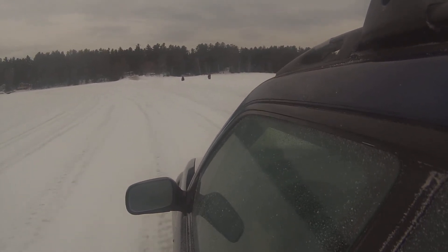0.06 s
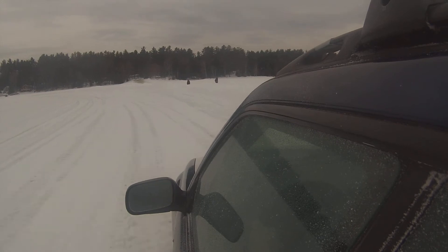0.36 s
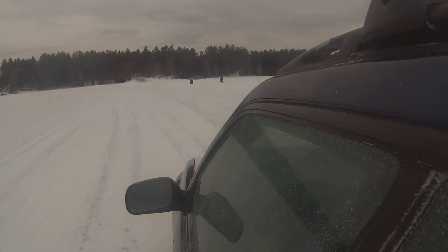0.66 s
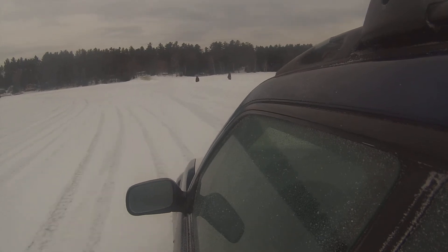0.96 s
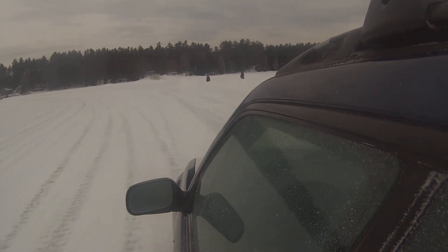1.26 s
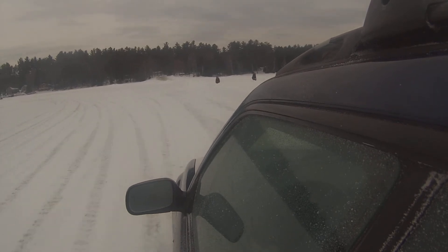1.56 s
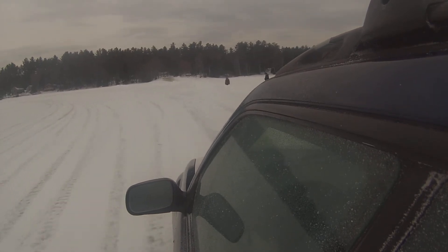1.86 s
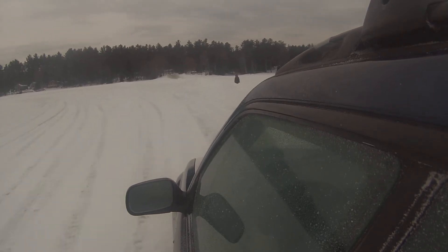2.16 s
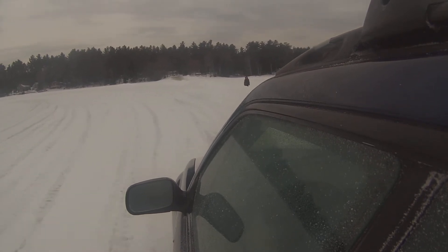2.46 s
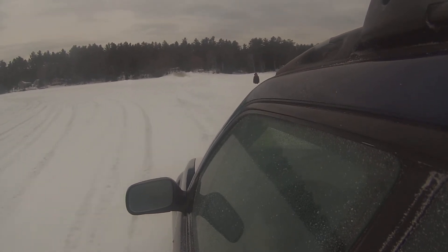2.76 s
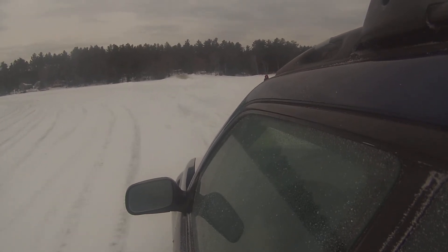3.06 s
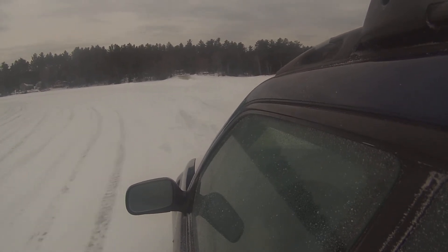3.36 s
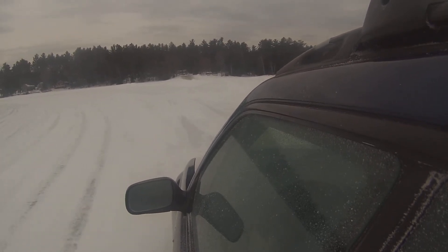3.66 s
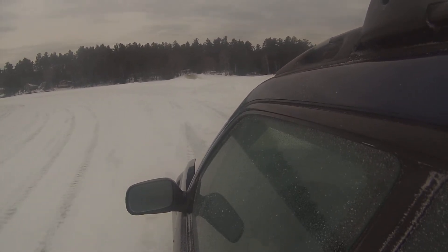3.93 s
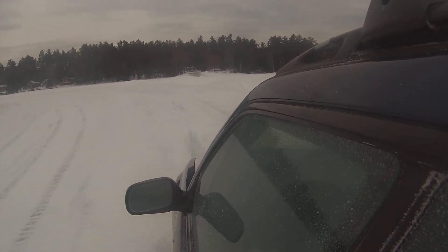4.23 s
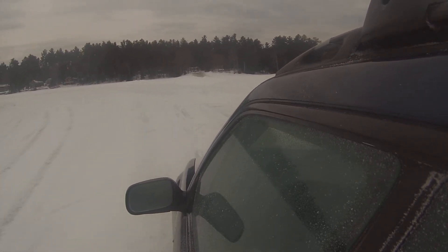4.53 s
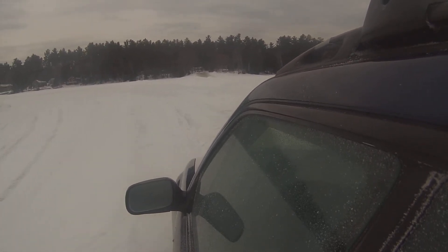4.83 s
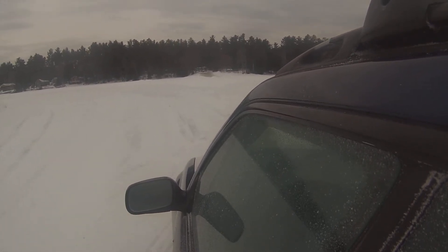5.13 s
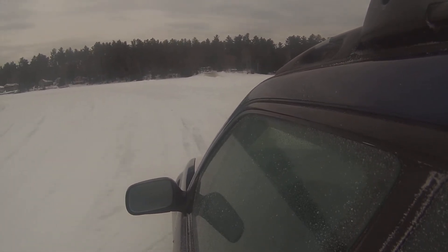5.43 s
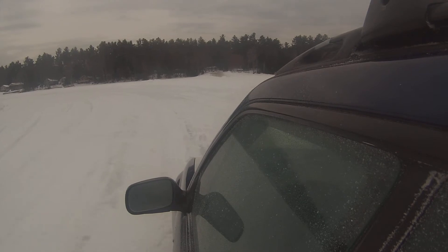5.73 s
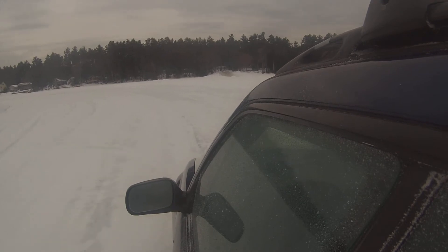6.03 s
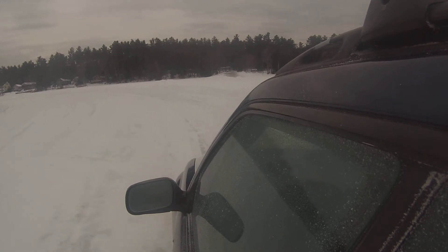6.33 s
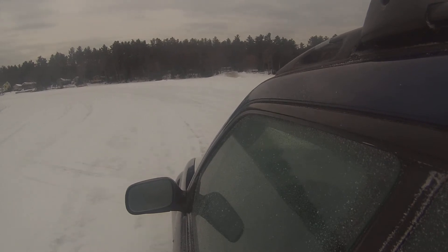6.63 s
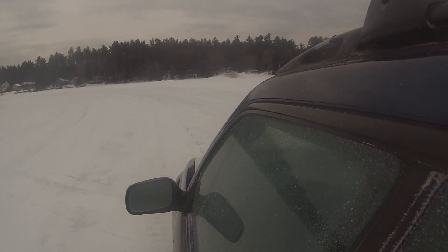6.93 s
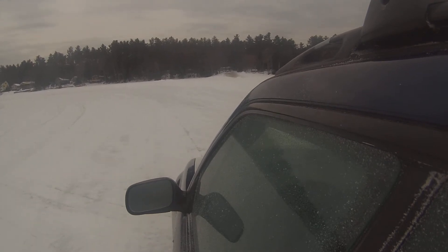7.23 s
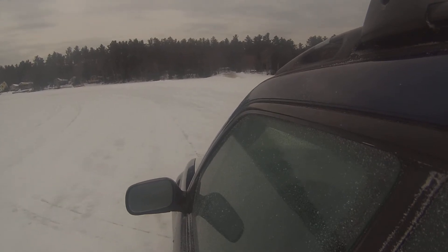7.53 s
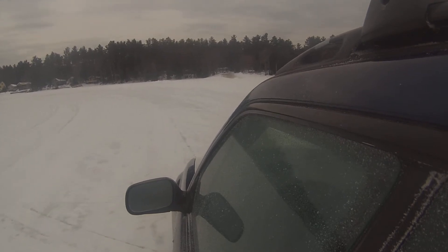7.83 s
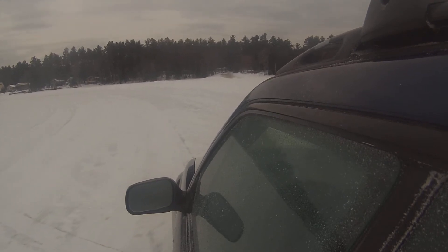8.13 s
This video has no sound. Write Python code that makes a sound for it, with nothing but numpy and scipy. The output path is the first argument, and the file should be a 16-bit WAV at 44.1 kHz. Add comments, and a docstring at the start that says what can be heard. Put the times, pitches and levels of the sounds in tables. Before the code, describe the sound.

Deep, bumpy car rumble and crunching snow fade as it brakes to idle, ending with two door latch clicks.

```python
"""On a snow-covered frozen lake a car rolls, engine idling, and brakes to a stop, heard from its side.
The bumpy ride sets the body and a camera mount swinging; the housing ticks when it is shaken hard.
Snow crunches and sprays under the tyres, thinning to single crumps, and bits of ice hit the bodywork.
A brake sings faintly on the way, and near the end the door latch clicks."""
import sys
import numpy as np
from scipy import signal
from scipy.fft import rfft, irfft, next_fast_len
from scipy.io import wavfile
from scipy.ndimage import uniform_filter1d, minimum_filter1d

SR = 44100
rng = np.random.default_rng(int(sys.argv[2]) if len(sys.argv) > 2 else 0)


def file_out(sig):
    """Save sig as 16-bit WAV at sys.argv[1]."""
    # one column per channel
    cols = np.atleast_2d(sig).T
    # limit, then scale
    lim = np.clip(cols, -1, 1)
    pcm = np.round(lim * 32767).astype(np.int16)
    wavfile.write(sys.argv[1], SR, pcm)


N = 369999
T = np.arange(N) / SR

# tone colour of breaking snow: (frequency [Hz], relative level [dB])
SNOW_COLOUR = [(400, -14), (650, -12.5), (800, -5.5), (1060, -2.5), (1200, -0.5), (1450, 3.5), (1550, -1),
               (1850, -2.5), (2100, -4.5), (2500, -8.5), (4000, -22.5)]
# the wheel arch rings with the breaking snow: (frequency [Hz], width [Hz], boost [dB])
ARCH_MODES = [(788, 18, 4.5), (1006, 50, 1.5), (1185, 45, 6), (1300, 90, 3), (1430, 97, 1), (1510, 85, -1),
              (1643, 123, 3), (1850, 50, -5), (2530, 320, -2.5)]


def from_db(db):
    """Decibels to gain."""
    return 10 ** (np.asarray(db) / 20)


def rms_one(x):
    """Scale to unit power."""
    return x / np.sqrt(np.mean(x ** 2) + 1e-20)


def evened(x, span_s):
    """Hold the power steady over spans of this length."""
    return x / np.sqrt(uniform_filter1d(x ** 2, max(int(span_s * SR), 3)).clip(1e-12))


def in_time(rows):
    """Breakpoint rows (time, values...) to one curve per value."""
    times, *columns = np.transpose(rows)
    return [np.interp(T, times, column) for column in columns]


def swells(rows, edge_s):
    """Envelope for rows of (start [s], length [s], level [dB]): each fades in and out."""
    return sum(from_db(db) * np.clip(0.5 + np.minimum(T - s, s + length - T) / edge_s, 0, 1)
               for s, length, db in rows)


def rolling(speed, level_db, power):
    """Gain of a sound that grows as a power of the speed."""
    return from_db(level_db) * speed ** power


def drift(per_s):
    """Smooth random modulation; rms 1."""
    knots = rng.standard_normal(N // 20)
    return rms_one(np.interp(T * per_s, np.arange(len(knots)), knots))


def tone(cycles):
    """A sine from its running phase in cycles; rms 1."""
    return np.sqrt(2) * np.sin(2 * np.pi * cycles)


def grains(per_s, spread_db):
    """Random fractures: many small, a few large."""
    sizes = from_db(spread_db * np.minimum(rng.exponential(1, N), 4)) * rng.choice([-1, 1], N)
    return sizes * (rng.random(N) < per_s / SR)


def clicks_at(s, db):
    """Single clicks at given times and levels."""
    out = np.zeros(N)
    out[np.clip(np.round(np.asarray(s) * SR).astype(int), 0, N - 1)] = from_db(db)
    return out


def ring(clicks, hz, t60):
    """A unit click sets a sine of height 1 ringing down."""
    decay, angle = from_db(-60 / (t60 * SR)), 2 * np.pi * hz / SR
    return signal.lfilter([0, np.sin(angle)], [1, -2 * decay * np.cos(angle), decay ** 2], clicks + 1e-18)


def resonant(x, modes):
    """Each mode lifts or dips its own narrow band; rms 1."""
    for hz, width, db in modes:
        x = x + (from_db(db) - 1) * signal.lfilter(*signal.iirpeak(hz, hz / width, fs=SR), x)
    return rms_one(x)


def coloured(x, spectrum):
    """Shape a sound with a smooth minimum-phase EQ curve; rms 1."""
    size = next_fast_len(N + SR // 4) * 2
    hz, db = np.transpose(spectrum)
    octaves = np.log2(np.maximum(np.fft.rfftfreq(size, 1 / SR), 1))
    outside = np.maximum(np.log2(hz[0]) - octaves, 0) + np.maximum(octaves - np.log2(hz[-1]), 0)
    curve_db = np.interp(octaves, np.log2(hz), db) - 20 * np.minimum(outside, 2)
    cepstrum = irfft(np.log(from_db(curve_db)))
    cepstrum[1:size // 2] *= 2
    cepstrum[size // 2 + 1:] = 0
    return rms_one(irfft(rfft(x, size) * np.exp(rfft(cepstrum)))[:N])


def swinging(modes, span_s):
    """Random bumps keep steep-sided resonances swinging at a steady power."""
    hz = np.fft.rfftfreq(2 * next_fast_len(N), 1 / SR)[1:]
    power = sum(from_db(db) ** 2 / (1 + 1.1 * ((hz - centre ** 2 / hz) / (1.5 * width)) ** 2) ** 2
                for centre, width, db in modes)
    bumps = rng.standard_normal((2, len(hz)))
    spectrum = np.sqrt(power) * (bumps[0] + 1j * bumps[1])
    return evened(irfft(np.r_[0, spectrum])[:N], span_s)


def still_air():
    """A faint, steady bed of air over the lake."""
    # tone colour of the air: (frequency [Hz], relative level [dB])
    colour = [(100, -3), (230, 3.5), (600, 1.5), (1200, -3.5), (1700, -6.5), (2100, -5), (2400, -9),
              (2850, -5.5), (4200, -12), (5100, -11), (6200, -16), (8200, -14), (9200, -20.5),
              (11000, -14.5), (12500, -25), (15000, -35)]
    return from_db(-62.5) * coloured(rng.standard_normal(N), colour)


def whine():
    """The camera's electronics whine on a few thin tones."""
    # steady tones: (frequency [Hz], rms level [dB])
    partials = [(3000, -90), (4000, -95), (5000, -90), (7000, -98), (10000, -93), (11070, -94)]
    return sum(from_db(db) * tone(hz * T) for hz, db in partials)


def engine(firing_hz=25.74, wander=0.0075, ease_s=8.0, ease_takes_s=0.14):
    """The idling exhaust throbs on multiples of the firing rate; the load comes off as the car stops."""
    # exhaust tones: (multiple of the firing rate, rms level [dB], change off load [dB])
    orders = [(3, -41.5, -10), (3.5, -48, 1.5), (4.5, -66, -7), (5, -63.5, -2), (6, -67, 1), (7, -74, 3)]
    firings = np.cumsum(firing_hz * (1 + wander * drift(1.8))) / SR
    eased = np.clip((T - ease_s) / ease_takes_s, 0, 1)
    throb = from_db(0.5 * drift(11))
    return throb * sum(from_db(db + ease_db * eased + 3.5 * drift(25)) * tone(k * firings + rng.random())
                       for k, db, ease_db in orders)


def brake_pads(uneven_db=4.0):
    """Dry rubbing keeps the brake whispering in the last turns of the wheel."""
    # pad rubs: (start [s], length [s], level [dB])
    rubs = [(7.1, 0.35, -72), (8.08, 0.33, -71)]
    # brake resonances: (frequency [Hz], width [Hz], relative level [dB])
    modes = [(2070, 230, 2), (2800, 250, -7), (5100, 900, -8)]
    return swells(rubs, edge_s=0.06) * from_db(uneven_db * drift(45)) * swinging(modes, span_s=0.05)


def brake_squeal(waver_hz=16, uneven_db=1.5):
    """Friction sets one mode of the disc singing, a rough tone that flutters and sags."""
    # squeals: (start [s], length [s], first pitch [Hz], last pitch [Hz], level [dB])
    squeals = [(4.825, 0.083, 2850, 2825, -66.5), (4.91, 0.11, 2840, 2730, -64.5),
               (5.02, 0.11, 2845, 2820, -66)]
    out = np.zeros(N)
    for s, length, first_hz, last_hz, db in squeals:
        hz = in_time([(s, first_hz), (s + length, last_hz)])[0] + waver_hz * drift(150)
        out += swells([(s, length, db)], edge_s=0.025) * tone(np.cumsum(hz) / SR)
    return out * from_db(uneven_db * drift(110))


def door_latch():
    """Short, hard clicks of a small metal catch."""
    # latch clicks: (time [s], level [dB], offset of the two lowest modes [dB])
    clicks = [(7.888, -42.5, 2.5), (8.002, -41, -13)]
    # ring of the catch: (frequency [Hz], gain [dB], t60 [s])
    modes = [(1310, -7, 0.022), (3200, -3.5, 0.0094), (4960, -6, 0.0033), (5700, -11, .003),
             (6500, -7.5, 0.0054), (8400, -16, .003)]
    s, db, low_db = np.transpose(clicks)
    return sum(ring(clicks_at(s, db + mode_db + low_db * (k < 2)), hz, t60)
               for k, (hz, mode_db, t60) in enumerate(modes))


def ice_grit():
    """Loose crumbs of ice patter on the bodywork."""
    # showers of crumbs: (start [s], length [s], level [dB])
    showers = [(0.22, 0.49, -62), (3.05, 0.077, -60), (4.1, 0.33, -69.5), (5.8, .06, -78),
               (6.27, 0.084, -67.5)]
    # tone colour of the patter: (frequency [Hz], relative level [dB])
    colour = [(1500, -11.5), (3400, 6), (4800, 4.5), (6600, -2), (8500, -2.5), (12000, -6.5), (14500, -33)]
    return swells(showers, edge_s=0.021) * coloured(grains(per_s=700, spread_db=5.5), colour)


def ice_chips(crack=0.15):
    """Chips of ice thrown against the body strike with a crack and ring briefly."""
    # chip impacts: (time [s], level [dB], pitch [Hz], t60 [s])
    strikes = [(0.07, -32, 3870, 0.0082), (0.070, -29.5, 4770, 0.0048), (0.265, -47, 9500, .004),
               (1.386, -26, 1890, 0.01), (1.391, -35, 2920, 0.004), (2.188, -37, 4700, 0.0046),
               (6.290, -36.5, 3140, 0.0019)]
    out = np.zeros(N)
    for s, db, hz, t60 in strikes:
        hit = clicks_at([s], db)
        out += ring(hit, hz, t60) + crack * ring(hit, 0.97 * min(hz, 4700), t60 / 4)
    return out


def body_sway(speed, moving, sway_hz=24.76, wander=0.03593):
    """The body rocks on its suspension in one deep mode, swelling on big bumps."""
    # big bumps: (start [s], length [s], level [dB])
    bumps = [(0.0, 0.07, -11), (0.27, 0.24, -14), (0.65, 0.11, -16), (1.13, 0.18, -30), (1.38, 0.32, -23.5),
             (1.84, 0.12, -15.5), (2.1, 0.25, -18.5), (2.56, 0.14, -17.5), (3.18, 0.15, -16.5),
             (3.5, 0.3, -20), (3.96, 0.43, -20.5), (4.7, 0.29, -20), (5.11, 0.44, -20), (5.78, 0.24, -20.5),
             (6.1, 0.28, -19.5), (6.5, 0.62, -23.5), (7.18, 0.6, -26)]
    cycles = np.cumsum(sway_hz * (1 + wander * drift(4.7))) / SR + rng.random()
    gain = np.maximum(moving * rolling(speed, level_db=-30, power=0.11), swells(bumps, edge_s=0.14))
    return gain * tone(cycles)


def body_panel(speed, uneven_db=2.7):
    """A body panel drones with the speed, louder at each jolt."""
    # jolts: (start [s], length [s], level [dB])
    jolts = [(0.02, 0.66, -28.5), (1.3, 0.65, -41), (2.7, 0.58, -35), (3.47, 0.31, -41.5),
             (3.92, 0.27, -36.5), (5.23, 0.1, -34.5), (6.16, 0.1, -40.5), (6.45, 0.15, -43.5),
             (6.97, 0.23, -44)]
    # panel resonances: (frequency [Hz], width [Hz], relative level [dB])
    modes = [(132.7, 10.3, 2.5), (120.3, 26, -11.5)]
    gain = np.hypot(rolling(speed, level_db=-36.5, power=0.74), swells(jolts, edge_s=0.13))
    return gain * from_db(uneven_db * drift(8)) * swinging(modes, span_s=0.17)


def mount_shake(speed, moving, ducking=0.39, uneven_db=2.5):
    """The mount rumbles at random; on rutted stretches it locks into a judder at one pitch."""
    # mount resonances: (frequency [Hz], width [Hz], relative level [dB])
    modes = [(30.64, 10, -2), (41.16, 12, -4.5), (57.83, 12, -0.5), (76.2, 12, 0.5), (90, 12, -2),
             (101.4, 13, -12)]
    # snow ridges shake it harder: (start [s], length [s], level [dB])
    ridges = [(0.0, 0.024, -4.5), (0.98, 0.085, -21), (4.07, 0.093, -26), (4.3, 0.087, -23.5),
              (4.49, 0.063, -22), (4.75, 0.19, -25), (5.11, 0.093, -28), (5.24, 0.1, -25.5),
              (5.39, 0.12, -28), (5.68, 0.053, -29), (5.82, 0.059, -29.5), (5.97, 0.17, -32.5),
              (6.19, 0.14, -29), (6.46, 0.064, -28.5), (6.66, 0.14, -34.5), (7.1, 0.053, -35.5),
              (7.58, 0.098, -39)]
    # judders: (start [s], length [s], first pitch [Hz], last pitch [Hz], first level [dB], last level [dB])
    judders = [(0.288, 0.38, 83.8, 78.6, -17.5, -18), (1.766, 0.2, 87.5, 89.8, -21.5, -21),
               (2.631, .37, 77.75, 77.7, -22.5, -17), (3.004, .24, 75.9, 72.4, -20, -18),
               (3.52, 0.13, 71, 68.7, -23, -24), (4.347, .6, 59.03, 52.3, -29.5, -30.5)]
    jarring = np.hypot(moving * rolling(speed, level_db=-21, power=0.8), swells(ridges, edge_s=0.092))
    shake = jarring * from_db(1.2 * drift(8.3)) * swinging(modes, span_s=0.12)
    for s, length, first_hz, last_hz, first_db, last_db in judders:
        hz, db = in_time([(s, first_hz, first_db), (s + length, last_hz, last_db)])
        locked = swells([(s, length, 0)], edge_s=0.033)
        swing = tone(np.cumsum(hz) / SR + rng.random())
        shake = shake * (1 - ducking * locked) + locked * from_db(db + uneven_db * drift(30)) * swing
    return shake


def housing_ticks(shake, chatter_db=-51, full_swing=0.25, bounce_s=0.0042, bounce_db=-6, hard_db=-33):
    """The loose housing ticks just after each turn of the mount's swing and bounces twice."""
    # runs of louder rattling: (start [s], length [s], first level [dB], last level [dB])
    rattles = [(0.347, 0.31, -41.5, -46), (1.842, 0.09, -39, -34), (2.345, 0.033, -33, -37),
               (2.597, 0.057, -34, -38), (2.727, 0.14, -36.5, -41), (2.905, 0.29, -42, -44),
               (4.31, 0.078, -47, -41)]
    # hard knocks against the mount, and two chips of ice striking the housing (at 0.068 s and 2.187 s): (time
    # [s], level [dB])
    knocks = [(0.068, -36), (0.309, -40), (0.41, -47), (0.474, -37), (0.505, -51), (0.539, -37.5),
              (0.589, -34.5), (0.602, -35), (0.9362, -37.5), (1.782, -36), (1.862, -42), (1.873, -37),
              (1.885, -36), (2.015, -47), (2.0562, -44), (2.1868, -39), (2.2544, -41), (2.75, -39),
              (2.829, -37.5), (2.942, -39), (2.968, -34.5), (3.008, -40), (3.045, -44), (3.073, -35.5),
              (3.087, -40), (3.1, -41), (3.114, -35), (3.129, -33.5), (3.156, -35), (3.17, -36),
              (3.181, -34), (3.223, -41), (3.235, -40), (3.614, -41), (3.9686, -46), (4.117, -47),
              (4.2306, -45), (5.1482, -44.5), (5.153, -49), (5.2217, -47), (5.822, -50), (6.3123, -51),
              (6.783, -54)]
    # ring of the housing: (frequency [Hz], gain [dB], t60 [s])
    modes = [(3570, -7, 0.0055), (4700, -31, 0.005), (6340, 1, 0.0041), (7060, -4, 0.0054),
             (9350, -15.5, 0.006), (11500, -16.5, 0.0042), (12700, -16, .002)]
    turns = signal.find_peaks(np.abs(shake), height=0.02, distance=SR // 260)[0]
    runs_db = [np.interp(turns / SR, [s, s + length], [first, last], chatter_db, chatter_db)
               for s, length, first, last in rattles]
    swing_db = 20 * np.log10(np.minimum(np.abs(shake[turns]) / full_swing, 1))
    return_db = -3 * (shake[turns] < 0)  # softer on the way back
    scatter_db = 5.5 * rng.uniform(-2.1, 1, N)[turns]
    turn_db = np.max(runs_db, axis=0) + 1.2 * swing_db + return_db + scatter_db
    flight_s = bounce_s * rng.uniform(0.66, 1.4, N)[turns]
    chatter = sum(clicks_at(turns / SR + 0.0036 + k * flight_s, turn_db + k * bounce_db) for k in range(3))
    hits = clicks_at(*np.transpose(knocks)) + chatter
    # each contact scuffs for an instant, differently for every mode
    scuff = 0.16 * signal.lfilter([1], [1, -np.exp(-1 / (0.00081 * SR))], hits + 1e-18)
    ticks = sum((-1) ** k * from_db(db) * ring(hits + scuff * rng.standard_normal(N), hz, t60)
                for k, (hz, db, t60) in enumerate(modes))
    # a light touch sounds mostly the main pair of modes, a hard knock all of them
    hardness = np.clip(-minimum_filter1d(-hits, size=SR // 200) / from_db(hard_db), 0, 1)
    soft = signal.sosfilt(signal.butter(1, [5600, 7900], "band", fs=SR, output="sos"), ticks)
    return soft + hardness * (ticks - soft)


def snow_packing():
    """Single grains give way under the creeping tyres and ring in the wheel arch."""
    # spells of sparse crackle: (start [s], length [s], level [dB])
    spells = [(6.7, 0.8, -69), (7.52, 0.38, -68.5)]
    crackle = coloured(grains(per_s=150, spread_db=5.0), SNOW_COLOUR)
    return swells(spells, edge_s=0.05) * resonant(crackle, ARCH_MODES)


def snow_crumps(t60=0.0093, crumble_s=0.0087, fractures_per_s=2000, low_cut_hz=550):
    """A lump of crust snaps under a tyre, then crumbles in a short burst of dry fractures."""
    # lumps giving way: (time [s], level [dB], pitch [Hz])
    lumps = [(0.515, -29, 1440), (3.221, -34, 815), (3.68, -36.5, 700), (4.492, -38, 1272),
             (5.305, -39, 1300), (5.836, -47, 1423), (5.944, -37, 1260), (7.031, -42, 1332),
             (7.072, -38, 1310), (7.193, -50, 1330), (7.553, -47, 1240), (7.620, -40, 1200),
             (7.69, -40.5, 1507), (7.704, -52.5, 1450), (7.779, -47.5, 980), (7.822, -53, 1400),
             (8.076, -46, 1400)]
    out, age = np.zeros(N), np.arange(SR // 8) / SR
    for s, db, hz in lumps:
        fractures = rng.uniform(-0.98, 1, len(age)) * (rng.random(len(age)) < fractures_per_s / SR)
        force = from_db(db) * ((age == 0) + 0.83 * fractures * np.exp(-age / crumble_s))
        thud = 0.33 * ring(force, 0.8 * hz, t60 / 2)
        crisp = 0.27 * ring(force, hz=2750, t60=0.002)
        burst = ring(force, hz, t60) + thud - crisp
        start = round(s * SR)
        out[start:start + len(age)] += burst[:N - start]
    return signal.sosfilt(signal.butter(2, low_cut_hz, "high", fs=SR, output="sos"), out + 1e-18)


def snow_crust():
    """The tread scrapes over crust: coarse fractures ring in the tyre and the wheel arch."""
    # crusted patches: (start [s], length [s], level [dB])
    patches = [(1.5, 0.295, -46), (3.36, 0.083, -48.5), (4.38, 0.065, -49.5), (4.7, 0.083, -48),
               (4.89, 0.092, -48), (4.99, 0.16, -52.5), (5.15, 0.12, -54), (5.28, 0.049, -54),
               (5.43, .05, -51), (6.19, 0.06, -54), (6.35, 0.16, -60.5), (6.94, 0.16, -63),
               (7.6, 0.055, -58)]
    # ring of the tyre: (frequency [Hz], width [Hz], boost [dB])
    tyre_modes = [(1250, 150, 5), (1660, 80, 3.5)]
    fractures = coloured(grains(per_s=900, spread_db=2.5), SNOW_COLOUR)
    scrape = resonant(fractures, ARCH_MODES + tyre_modes)
    return swells(patches, edge_s=0.063) * evened(scrape, span_s=0.035)


def tyres(speed, crunch_db=-40, grip_s=3.22, grip_takes_s=0.17, slip_db=2.5):
    """Snow grains break under the tread, fewer as the car slows; fine spray hisses over a rolling roar."""
    # tone colour of the spray: (frequency [Hz], relative level [dB])
    spray_colour = [(1500, -15.5), (2400, 6.5), (2900, 5), (3300, 6), (4200, -1.5), (5500, -8), (6600, -6),
                    (8000, -13), (11000, -23), (15000, -41)]
    # loose powder flung up: (start [s], length [s], level [dB])
    puffs = [(0.42, 0.27, -61), (6.16, 0.074, -65)]
    # tone colour of the roar: (frequency [Hz], relative level [dB])
    roar_colour = [(110, 5.5), (170, 2.5), (210, -1), (260, -3), (320, -1), (390, -6.5), (460, -9),
                   (620, -10), (900, -11), (1500, -18)]
    # a hollow in the body hums with the roar: (frequency [Hz], width [Hz], boost [dB])
    hollow = [(396.6, 26, 7)]
    breaking = rolling(speed, crunch_db, power=0.99)
    per_s = 600 + 4700 * breaking / from_db(crunch_db)
    breaks = evened(grains(per_s, spread_db=1.5), span_s=0.064) + 0.71 * rng.standard_normal(N)
    patchy = drift(14)  # patchy snow swells crunch, spray and roar together
    surges_db = (0.41 + 0.6 * (1 - speed)) * drift(55)  # a slow tyre crunches more roughly
    crunch = resonant(coloured(breaks, SNOW_COLOUR), ARCH_MODES)
    crunch *= breaking * from_db(0.39 * patchy + surges_db)
    # until the tyres grip they slip and throw extra spray
    slipping = np.clip((grip_s - T) / grip_takes_s, 0, 1)
    flung = rolling(speed, level_db=-52, power=1) * from_db(slip_db * slipping)
    spray = coloured(0.5 * breaks + rng.standard_normal(N), spray_colour)
    spray *= np.hypot(flung, swells(puffs, edge_s=0.064)) * from_db(0.98 * patchy)
    roar = resonant(coloured(rng.standard_normal(N), roar_colour), hollow)
    roar *= rolling(speed, level_db=-44.5, power=0.89) * from_db(1.7 * patchy)
    return crunch + spray + roar


def scene(creep_speed=0.034):
    """Rumble, snow, ice and the car's own noises over a quiet bed, in mono."""
    # the car slows to a stop: (time [s], relative speed [0-1])
    slowing = [(0, 0.96), (0.55, 0.96), (1.0, 0.76), (1.7, 0.74), (2.4, 0.55), (3.3, 0.44), (4.35, 0.31),
               (4.6, 0.28), (5.3, 0.22), (6.1, .13), (6.8, 0.069), (7.7, 0.044), (8.25, 0.017)]
    speed = in_time(slowing)[0]
    moving = np.tanh((speed / creep_speed) ** 2)  # shaking and rocking die away at a creep
    shake = mount_shake(speed, moving)
    rumble = body_sway(speed, moving) + shake + body_panel(speed)
    bed = still_air() + whine()
    car = engine() + housing_ticks(shake) + brake_pads() + brake_squeal() + door_latch()
    snow = tyres(speed) + snow_crust() + snow_crumps() + snow_packing()
    ice = ice_chips() + ice_grit()
    return (bed + rumble + car + snow + ice)[None]


def record(dry):
    """A steep low-pass cuts the very top."""
    return signal.sosfilt(signal.cheby2(14, 70, 15700, fs=SR, output="sos"), dry)


dry = scene()
out = record(dry)
file_out(out)
```